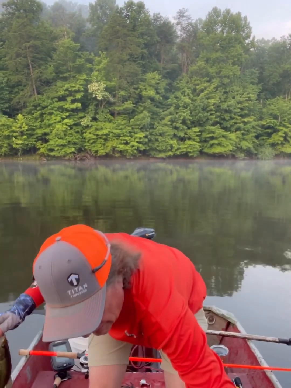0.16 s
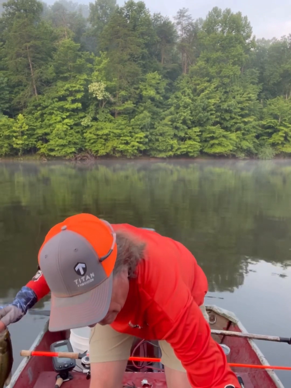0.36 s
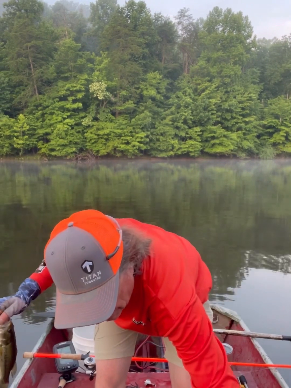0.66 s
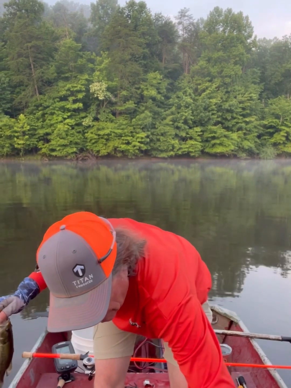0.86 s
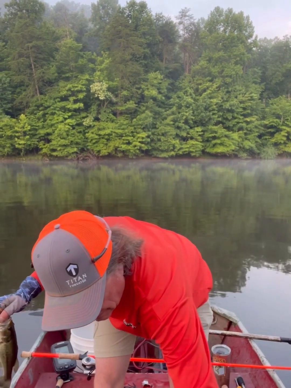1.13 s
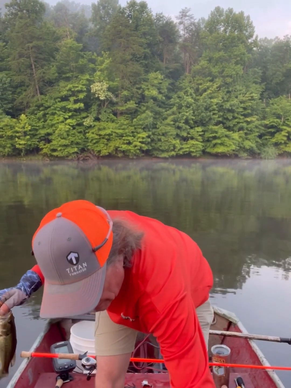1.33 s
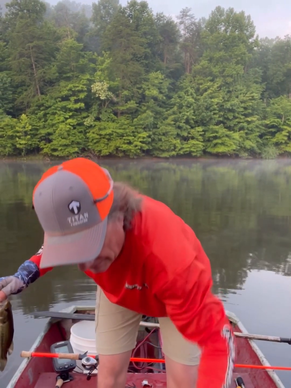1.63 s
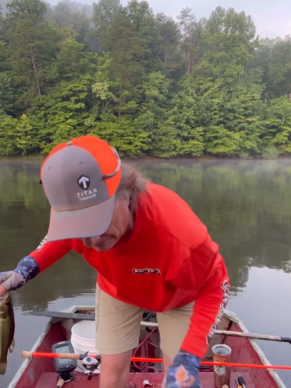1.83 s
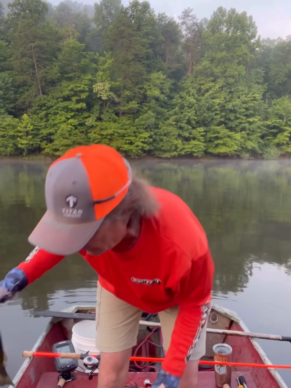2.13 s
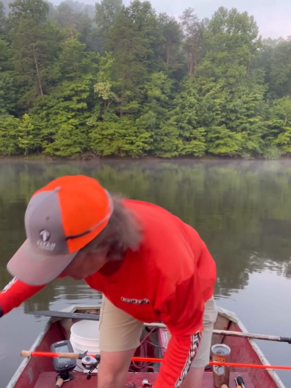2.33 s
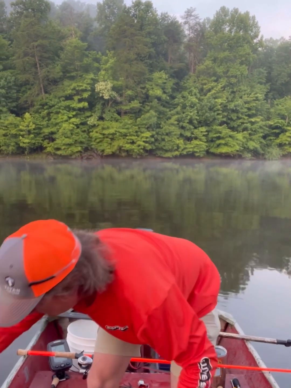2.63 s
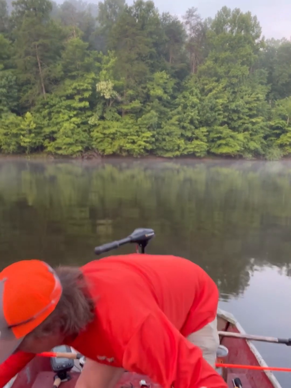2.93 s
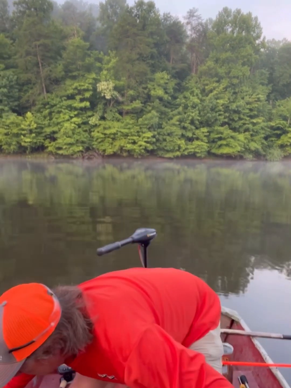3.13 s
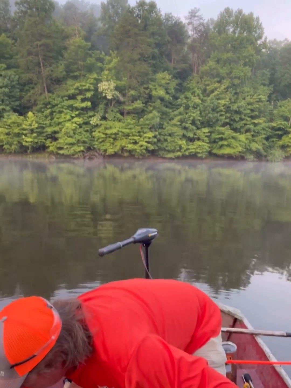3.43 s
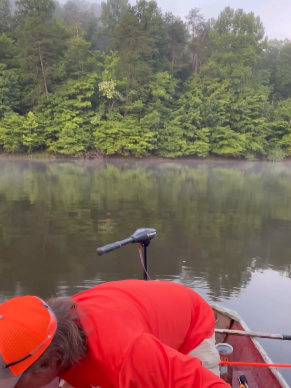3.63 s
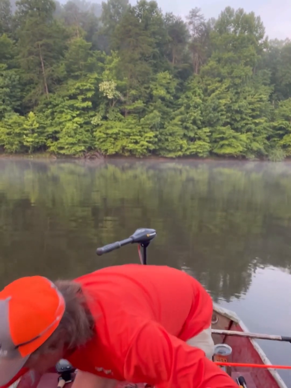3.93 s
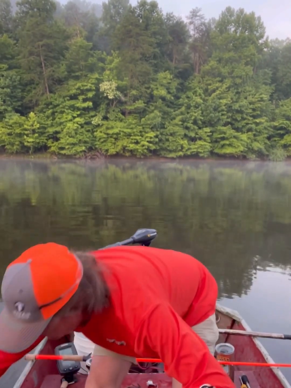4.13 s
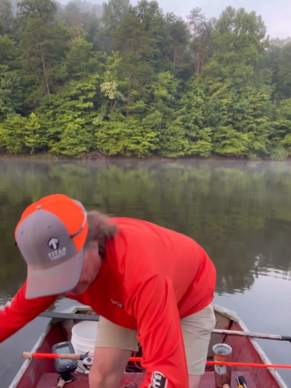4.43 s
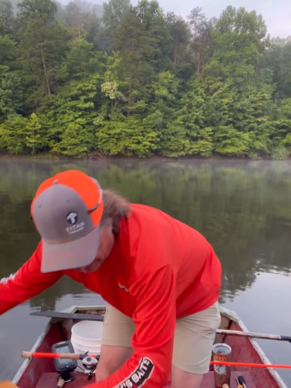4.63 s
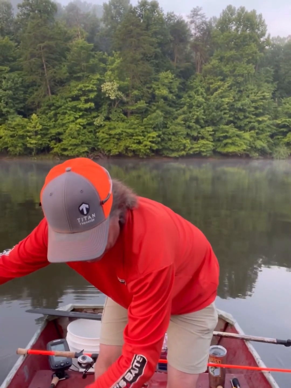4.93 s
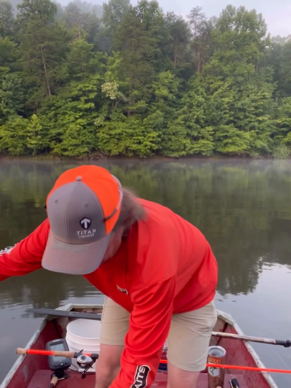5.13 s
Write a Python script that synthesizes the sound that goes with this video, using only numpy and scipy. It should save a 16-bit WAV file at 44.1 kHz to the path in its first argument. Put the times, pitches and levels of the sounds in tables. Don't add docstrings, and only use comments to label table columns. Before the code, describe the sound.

Outdoors on a still lake, close stereo phone microphones catch someone moving in a small metal boat. At once a lid grates, line rasps and gear scrapes; around 0.12-0.5 s a wet slap, a rubber chirp and a longer thin squeak sound while a tin box drags. A firm knock with a quick bounce lands at 0.56 s, then a soft, heavy boom at 0.74. Cloth rubs, and a lid creaks sharply at 1.3-1.5. The loudest blows crack and clang at 1.67 and 1.93, leaving a low hull hum. A tap at 2.3 and clink at 2.8 lead to quieter rustling, with soft thuds near 3.0 and a firm one at 3.6. Small taps cluster from 4.2, loudest at 4.55, and a bright dry tick snaps at 5.18. Throughout, insects chirr steadily and high; birds chip in quick rising pairs at 0.7-1.5, then trill, slur and whistle thinly, smeared by trees.

```python
import sys
import numpy as np
from scipy import signal
from scipy.fft import rfft, irfft
from scipy.io import wavfile
from scipy.ndimage import uniform_filter1d

SR = 44100
rng = np.random.default_rng(int(sys.argv[2]) if len(sys.argv) > 2 else 0)


def materialize(psi):
    bounded = np.clip(np.atleast_2d(psi).T, -1, 1)
    quanta = np.round(bounded * 32767).astype(np.int16)
    wavfile.write(sys.argv[1], SR, quanta)


def linear_from_db(decibels):
    return 10 ** (np.asarray(decibels, float) / 20)


N = 232218
TAP_PAN_DB = -2.5


def unit(x):
    return x / np.sqrt(np.mean(x ** 2))


def shape(x, points):
    hz, db = np.transpose(points)
    f = np.fft.rfftfreq(x.shape[-1], 1 / SR) + 1
    return irfft(rfft(x) * linear_from_db(np.interp(np.log(f), np.log(hz), db)), x.shape[-1])


def ring(x, hz, width_hz):
    return signal.lfilter(*signal.iirpeak(hz, hz / width_hz, SR), x)


def body(x, table):
    return unit(sum(linear_from_db(db) * ring(ring(x, hz, 3 * width), hz, width) for hz, width, db in table))


def walk(rate):
    k = int(SR / rate)
    held = np.repeat(rng.standard_normal(N // k + 1), k)
    return 0.52 * uniform_filter1d(uniform_filter1d(held, k), k)[:N]


def grains(per_s, spread_db, alike):
    size_db = spread_db * np.minimum(rng.exponential(size=N), 3)
    clicks = (rng.random(N) < per_s / SR) * linear_from_db(size_db)
    mid, side = clicks * rng.standard_normal((2, N))
    return np.array([mid, mid]) + np.sqrt(1 - np.clip(alike, 0, 1)) * np.array([side, -side])


def effort(rows, rise_db_s, fall_db_s):
    t = np.arange(N) / SR
    out = np.full((len(rows[0]) - 2, N), -120.)
    for s, length, *db in rows:
        off = rise_db_s * np.maximum(s - t, 0) + fall_db_s * np.maximum(t - s - length, 0)
        out = np.maximum(out, np.array(db)[:, None] - off)
    return out


def patchy(x, patchy_db):
    hz, _, z = signal.stft(x, SR, nperseg=512)
    field = uniform_filter1d(rng.standard_normal(z.shape[1:]), size=3, axis=0)
    field = uniform_filter1d(field, size=7, axis=1)
    field_db = patchy_db * unit(field) * np.clip(hz / 800 - 1.2, 0, 1)[:, None]
    return signal.istft(z * linear_from_db(field_db), SR, nperseg=512)[1][:, :N]


def add(out, x, s, pan_db):
    i = int(s * SR)
    x = x[..., :N - i] * linear_from_db(np.array([[pan_db], [-pan_db]]) / 2)
    out[:, i:i + x.shape[1]] += x


def decay(t, t60):
    return np.exp(-np.log(1000) * t / t60)


def fade(t):
    return np.clip((t[-1] - .04 - t) / .08, 0, 1)


def modes(table, t, scatter_db, turn):
    hz, db, t60 = np.transpose(table)[:, :, None]
    gain, start, step = rng.standard_normal((3, len(table), 1))
    tone_level = linear_from_db(db + scatter_db * gain) * decay(t, np.clip(t60, .01, .6))
    step = turn * step * np.clip(hz / 600, 0, 1)
    phase = 2 * np.pi * hz * t + 3 * start
    return np.array([np.sum(tone_level * np.sin(phase + side * step), axis=0) for side in (1, -1)])


def burst(t, rise_s, t60):
    noise = rng.standard_normal(len(t)) + 0.45 * rng.standard_normal((2, len(t)))
    return noise * (1 - np.exp(-t / rise_s)) * decay(t, t60)


# (frequency [Hz], level [dB per Hz])
SHORE = [(25, -7.5), (127, -4.5), (479, -12), (1670, -28), (2780, -11.5), (4600, -8), (5540, -19),
         (12000, -46)]


def shore():
    return linear_from_db(-67.5 + 0.89 * walk(12.0)) * unit(shape(grains(SR, 0, 0.23), SHORE))


# (frequency [Hz], width [Hz], level [dB])
INSECTS = [(4640, 390, -59), (2700, 370, -71.5)]


def insects():
    out = 0
    for hz, width, db in INSECTS:
        chorus = ring(ring(grains(3000, 1.2, 0.27), hz, width), hz, width)
        out = out + linear_from_db(db + 1.1 * walk(3.0) + 0.5 * walk(33)) * unit(chorus)
    return out


# (start [s], length [s], weight on the hull [dB], drag of gear [dB])
MOVES = [(0, 0.017, -56, -49), (.13, 0.047, -48.5, -44.5), (.17, 0.44, -56, -47.5), (.61, 0.22, -41, -48),
         (.78, 0.12, -43, -67), (.95, 0.078, -47.5, -51.5), (1.11, 0.15, -54.5, -53),
         (1.26, 0.23, -47.5, -45), (1.74, 0.4, -44.5, -78), (2.0, 0.16, -47, -60.5), (2.17, 0.55, -60, -62),
         (2.79, 0.11, -48, -55.5), (2.97, 0.13, -58, -56), (3.12, 0.096, -49.5, -57.5),
         (3.47, 0.055, -60, -87), (3.6, 0.12, -59, -86), (3.85, 0.1, -52, -58), (4.07, 0.21, -57.5, -62.5),
         (4.21, 0.034, -50, -59.5), (4.57, 0.06, -61.5, -73), (4.67, 0.04, -59, -63.5),
         (4.85, 0.095, -60.5, -64), (4.99, 0.036, -51, -87), (5.18, 0.027, -53.5, -61)]
# (start [s], length [s], rub [dB], cloth [dB])
SWEEPS = [(0, 0.028, -48, -47), (.15, 0.38, -50, -53.5), (.62, 0.13, -51.5, -55), (.78, 0.13, -55.5, -61),
          (.94, 0.098, -55, -59.5), (1.09, 0.013, -69, -58), (1.15, 0.28, -53, -59),
          (1.4, 0.059, -46.5, -55.5), (1.76, 0.36, -56.5, -71), (2.0, 0.011, -63, -52),
          (2.15, 0.53, -59, -63), (2.77, 0.12, -53, -51.5), (3.04, 0.13, -59.5, -68.5),
          (3.47, 0.2, -67, -93), (3.84, 0.13, -56, -63), (4.08, 0.17, -56.5, -57.5),
          (4.3, 0.086, -57, -60.5), (4.412, 0.03, -58.5, -57.5), (4.555, 0.0085, -64, -76),
          (4.8, 0.095, -70, -83.5), (5.18, 0.037, -58, -65)]
# (frequency [Hz], width [Hz], level [dB])
SCRAPE = [(246, 14, 5.5), (444, 240, 2.5), (624, 250, -4.5), (860, 50, -1), (950, 64, -13)]
# (frequency [Hz], width [Hz], level [dB])
RUB = [(1470, 270, -3.5), (2334, 1000, 4.5), (2888, 110, 4), (3460, 490, -5.5)]
# (frequency [Hz], level [dB per Hz])
CLOTH = [(2060, -45.5), (3500, -14), (4650, -4), (8620, -10), (11600, -15.5), (12600, -14), (13300, -58)]


def handling():
    rumble_db, scrape_db = effort(MOVES, rise_db_s=598, fall_db_s=243)
    rub_db, cloth_db = effort(SWEEPS, rise_db_s=496, fall_db_s=300.5)
    hull = [(62, 27, -11.0), (86.5, 81, 2.5), (117.0, 41, -1.5), (156.9, 10.0, 5.0), (221, 47, -7.0)]
    rumble = body(grains(810, 5.7, 1.0), hull)
    scrape = body(grains(2100, 0.94, 0.72), SCRAPE) * linear_from_db(np.array([[-1.5], [1.5]]))
    rub = body(grains(4000, 0.73, 0.57), RUB)
    cloth = unit(shape(grains(7300, 1.1, 0.55), CLOTH))
    drag_db = 3 * np.clip(walk(35), -2, 1.2)
    out = rumble * linear_from_db(rumble_db - 3.0 + 0.83 * walk(2.6))
    out = out + scrape * linear_from_db(scrape_db - 3.5 + drag_db)
    out = out + rub * linear_from_db(rub_db - 5.0 + drag_db)
    return out + cloth * linear_from_db(cloth_db - 4.0 + 1.4 * walk(33))


# (time [s], level [dB])
PULL = [
    (0, -60),
    (.13, -97),
    (.155, -47),
    (.3, -47.5),
    (.45, -57.5),
    (.55, -52.5),
    (.6, -90.5),
]
# (frequency [Hz], width [Hz], level [dB])
TIN = [(243.2, 30, -3), (1600, 110, 5.5), (2300, 180, 2.5), (3797, 100, -17), (4840, 320, -6.5),
       (5900, 120, -5), (6800, 350, -9), (7710, 230, -8.5), (8980, 92, -4.5)]


def tin_box():
    pull_db = np.interp(np.arange(N) / SR, *np.transpose(PULL))
    return body(grains(4500, 1.2, 1.0), TIN) * linear_from_db(pull_db + 1.0 * walk(41))


# (start [s], length [s], level [dB])
RASPS = [
    (0, 0.11, -54),
]
# (frequency [Hz], width [Hz], level [dB])
RINGS = [(6900, 560, 2.6), (7960, 400, -5)]


def line_rasp():
    return body(grains(1200, 2, 0.97), RINGS) * linear_from_db(effort(RASPS, 500, 500))


# (start [s], length [s], level [dB])
GROANS = [
    (.01, 0.027, -43.5),
    (.42, 0.055, -44),
]
# (frequency [Hz], width [Hz], level [dB])
SEAT = [(238.7, 21, 0)]


def seat_groans():
    return body(grains(900, 1.5, 0.4), SEAT) * linear_from_db(effort(GROANS, 330, 200))


# (start [s], length [s], level [dB])
CREAKS = [
    (1.29, 0.009, -39.5),
    (1.33, 0.035, -41.5),
    (1.418, 0.012, -37),
    (1.44, 0.019, -38.5),
    (1.466, 0.0056, -42.5),
    (4.25, 0.11, -64.5),
]
# (frequency [Hz], width [Hz], level [dB])
LID = [(816, 14, 6), (580, 42, -4.5)]


def lid_creaks():
    creak_db = effort(CREAKS, 1400, 910) + np.array([[-2.5], [2.5]])
    return body(grains(1500, 1.2, 0.35), LID) * linear_from_db(creak_db)


# (start [s], length [s], level [dB])
SLIDES = [
    (0, 0.037, -39),
    (.058, 0.0073, -51),
    (.09, 0.023, -49),
]
# (frequency [Hz], width [Hz], level [dB])
HATCH = [(442, 65, -0.5), (560, 67, 1.5), (844, 110, -1.5), (2150, 69, -5.5)]


def sliding_lid():
    return body(grains(6000, 0.87, .5), HATCH) * linear_from_db(effort(SLIDES, 900, 450))


# (time [s], peak level [dB], pitch of the struck part [Hz], ring [s])
CLINKS = [
    (0.059, -42, 249, 0.086),
    (0.089, -36, 783, 0.051),
    (1.015, -40, 193, 0.37),
    (2.783, -33, 998, 0.02),
    (4.449, -47.5, 2300, 0.028),
    (4.549, -32, 533, 0.043),
    (4.839, -48, 1930, 0.049),
    (5.166, -43.5, 734, 0.089),
]
# (time [s], peak level [dB], pitch [Hz], ring [s])
TAPS = [(1.243, -42, 950, 0.082), (1.292, -34.5, 870, 0.022), (1.419, -44, 756, 0.043),
        (1.464, -59, 750, 0.049), (2.282, -33.5, 910, 0.0088), (3.187, -43.5, 533, 0.045),
        (3.448, -51.5, 342, 0.086), (4.206, -43.5, 713, 0.045), (4.424, -56, 2150, 0.055),
        (4.44, -52.5, 820, 0.067), (4.66, -41.5, 696, 0.039), (4.808, -43, 520, 0.095),
        (4.557, -26.5, 510, 0.046), (4.919, -51.5, 650, 0.024), (4.975, -54, 744, 0.058)]
# (time [s], peak level [dB], pitch [Hz], ring [s])
THUDS = [
    (0.15, -36, 834, 0.31),
    (0.364, -38.5, 492, 0.27),
    (2.996, -37.5, 413, 0.098),
    (3.143, -48.5, 793, 0.19),
    (3.588, -32.5, 489.4, 0.17),
    (3.607, -33.5, 421.5, 0.22),
    (3.84, -49, 739, 0.22),
]


def taps():
    out, t = np.zeros((2, N)), np.arange(SR // 3) / SR
    kinds = ((CLINKS, -6), (TAPS, -28), (THUDS, -60))
    for s, db, hz, t60, crack_db in [(*row, crack_db) for rows, crack_db in kinds for row in rows]:
        wet_db = 45 * t60
        part = [(hz, 0, t60), (hz * 1.17, -7, t60 * .8), (hz * .82, -11, t60),
                (hz * .55, wet_db - 22, t60), (hz * 1.6, -11, t60 * 0.7), (2250, crack_db, .04)]
        ringing = modes(part, t, scatter_db=2, turn=.3) * (1 - np.exp(-t / .001))
        bright = shape(burst(t, .0007, t60 * .5),
                       [(hz / 2, -20), (hz * 1.4, 0), (hz * 2.4, -10), (hz * 7, -56)])
        dark = shape(burst(t, .003, t60 * 1.3),
                     [(hz / 4, -24), (hz * .7, -3), (hz * 1.2, 0), (hz * 2.2, -24), (hz * 6, -70)])
        crack = shape(burst(t, 0.0076, 0.073), [(3000, 7.0), (6000, 7.0), (11000, -3.0), (15000, -6.0)])
        hit = linear_from_db(-1.5 - wet_db / 2) * ringing + linear_from_db(6 - wet_db / 2) * bright
        hit = hit + linear_from_db(wet_db - 2) * dark + linear_from_db(crack_db - 2.5) * crack
        add(out, linear_from_db(db) * fade(t) * hit, s, TAP_PAN_DB)
    return out


# (time [s], peak level [dB], pitch [Hz], ring [s])
KNOCKS = [(.124, -52, 1400, .012), (0.15, -27, 1250, .015), (.7382, -27.5, 2230, 0.026),
          (0.77, -39, 2440, .03), (0.76, -35.5, 5540, 0.027), (1.293, -34, 900, .02),
          (1.595, -55, 960, .01), (2.282, -43, 1000, .012), (.832, -38, 330, .06), (.76, -38, 630, .04),
          (4.661, -43.5, 720, 0.023), (4.81, -41.5, 580, 0.024), (4.977, -52, 640, 0.022),
          (.09, -42, 770, 0.024), (4.99, -60, 8600, .01), (5.056, -58, 6200, .01), (5.18, -45, 7000, .03),
          (4, -57, 8600, .015), (2.753, -49, 7200, 0.018)]


def knocks():
    out, t = np.zeros((2, N)), np.arange(SR // 8) / SR
    for s, db, hz, t60 in KNOCKS:
        partials = ((.62, 5.5), (1, 4), (1.35, -13), (1.9, -26))  # (ratio, dB)
        part = [(hz * ratio, part_db, t60) for ratio, part_db in partials]
        knock = modes(part, t, scatter_db=-0.5, turn=0.58) * np.clip(t / 0.00049, 0, 1)
        add(out, linear_from_db(db - 6.5) * knock, s - .001, TAP_PAN_DB)
    return out


# (time [s], frequency [Hz], level [dB])
SQUEAKS = [
    [(0.12, 2870, -76), (0.132, 2990, -44), (0.15, 2760, -31.5), (0.175, 2700, -68)],
    [(0.245, 3320, -59), (0.265, 3300, -43), (0.284, 3310, -38), (0.31, 3286, -38), (0.326, 3310, -53),
     (0.37, 3316, -38), (0.44, 3296, -49.5), (0.53, 3250, -62), (0.55, 3310, -68)],
]


def squeaks():
    out = np.zeros((2, N))
    for table in SQUEAKS:
        s, hz, db = np.transpose(table)
        t = np.arange(s[0], s[-1], 1 / SR)
        turns = np.cumsum(np.interp(t, s, hz) * (1 + 0.0066 * walk(122)[:len(t)])) / SR
        level = linear_from_db(np.interp(t, s, db) + 3.5 + 2.5 * walk(61)[:len(t)])
        level = level * signal.windows.tukey(len(t), .2)
        add(out, level * np.sin(2 * np.pi * turns + np.array([[.6], [-.6]])), s[0], -.8)
    return out


def far_chorus():
    notes = []
    for when, pitch, slur, size in rng.random((170, 4)):
        hz = 2200 + 1500 * pitch
        notes.append((4.75 * when, .015 + .035 * size, hz, hz * (.75 + .5 * slur), -70 + 3 * size, .5))
    return notes


# (start [s], length [s], first pitch [Hz], last pitch [Hz], level [dB])
DIVES = [(1.597, 0.089, 7300, 4100, -53.5), (1.733, 0.049, 10000, 4140, -50.5),
         (1.857, 0.051, 7260, 5300, -52), (.858, 0.029, 5950, 5400, -55), (1.05, .03, 6000, 5500, -53),
         (1.242, 0.03, 5540, 5600, -60), (1.258, 0.026, 7400, 4800, -51.5),
         (4.689, 0.07, 7270, 5930, -75.5), (2.229, 0.041, 3000, 2500, -54.5),
         (4.463, 0.024, 3380, 2995, -57.5), (4.502, 0.03, 3300, 3000, -56.5),
         (4.423, 0.034, 2030, 2260, -55), (4, 0.022, 3150, 3450, -55), (4.585, 0.028, 3100, 2900, -59),
         (4.69, 0.034, 2850, 2400, -63.5), (4.3, .035, 2100, 2900, -56), (4.39, .025, 3000, 2800, -56),
         (.845, 0.021, 3350, 3150, -54), (5.07, 0.053, 2500, 1870, -71)]
# (start [s], length [s], first pitch
# [Hz], last pitch [Hz], level [dB])
HOOKS = [(2.095, 0.12, 7600, 6830, -56), (2.62, 0.16, 6000, 6500, -66), (2.95, 0.21, 5540, 6300, -61),
         (3.272, 0.2, 5390, 6200, -62.5), (3.431, 0.12, 5500, 5000, -56.5),
         (3.603, 0.17, 5190, 5680, -59.5), (3.955, 0.13, 4840, 5040, -58.5),
         (4.905, 0.16, 3800, 4450, -65.5), (5.126, 0.14, 3900, 4130, -65.5), (5.04, 0.096, 2400, 1880, -90),
         (3.25, .3, 6550, 6100, -69.5), (.165, .085, 3560, 3460, -50.5), (.205, 0.041, 3800, 4800, -44.5)]
# (start [s], length [s], pitch [Hz], level [dB])
PIPS = [
    (0.878, 0.023, 4494, -48),
    (1.205, 0.053, 4480, -50),
    (1.438, 0.014, 7440, -53.5),
    (1.454, 0.032, 6250, -59.5),
    (1.524, 0.034, 3904, -54),
    (1.074, 0.018, 4480, -46.5),
    (1.99, 0.125, 5530, -61),
    (3.175, 0.043, 5260, -62),
    (3.285, 0.0075, 1334, -54.5),
    (3.407, 0.0077, 1305, -59),
]


def song():
    dives = [(*note, 0.62) for note in DIVES]
    hooks = [(*note, 12) for note in HOOKS]
    pips = [(s, length, hz, hz * 0.97, db, 1.) for s, length, hz, db in PIPS]
    return dives + hooks + pips


# (first note [s], last note [s], level [dB])
TRILLS = [
    (1.598, 1.66, -53),
    (1.765, 1.9, -54),
]


def trill():
    return [(s, .014, 2100, 2750, db, .8)
            for first_s, last_s, db in TRILLS for s in np.arange(first_s, last_s, .0165)]


def birds():
    voice = np.zeros((2, N))
    throat, gusts = np.tile(walk(300), 2), np.tile(walk(70), 2)
    for s, length, first_hz, last_hz, db, bend in song() + trill() + far_chorus():
        u = np.arange(0, 1, 1 / (length * SR))
        i = int(s * SR)
        hz = first_hz + (last_hz - first_hz) * (1 - np.exp(-bend * u)) / (1 - np.exp(-bend))
        hz = hz * (1 + .018 * np.sin(2 * np.pi * 95 * u * length + 40 * s))
        hz = hz * (1 + .018 * throat[i:][:len(u)])
        level = linear_from_db(db + 3.5 * gusts[i:][:len(u)]) * np.sin(np.pi * u ** 0.51)
        add(voice, level * np.sin(2 * np.pi * np.cumsum(hz) / SR), s, 0)
    t = np.arange(SR // 2) / SR
    leaves, trees = burst(t, .001, .06), burst(t, .02, .6)
    smear = linear_from_db(-20) * leaves + linear_from_db(-36) * shape(trees, [(1600, -30), (2200, 0)])
    return linear_from_db(-10) * voice + signal.fftconvolve(voice, smear, axes=1)[:, :N]


def skid(db, length_s):
    t = np.arange(-length_s, 0, 1 / SR)
    level = linear_from_db(db + 1500 * t + 2.5 * np.sin(2 * np.pi * 170 * t))
    whine = level * np.sin(2 * np.pi * 2620 * t + np.array([[.3], [-.3]]))
    return whine * np.hanning(int(2 * length_s * SR) + 2)[:len(t)]


# (time [s], peak level [dB], crack [dB], boom [dB], contact [ms])
BLOWS = [
    (0.557, -13, -2, -3, 6.5),
    (0.576, -23, -6.5, -31, 1.9),
    (0.736, -7, -55, -8.5, 62),
    (1.673, -4.5, -7.5, -6.5, 3.7),
    (1.926, -1.5, -8, -17, 4.2),
]
# (short ribs [dB], plates [dB], contact snap [dB], loose buzz [dB], rib ring left [share])
SPOTS = [
    (-10, 0.5, -26, 2, 0.87),
    (1, 1.5, -19, -4.5, 0.92),
    (-22, 8.5, -40, -5, 1.),
    (5, 1, 1, -3, 0.88),
    (9, 0, -6, -0.5, 0.82),
]
# (frequency [Hz], level [dB], t60 [s])
HULL = [(84.7, -5, 0.4), (142.5, 2, 0.26), (172.1, 2.5, 0.26), (325, -1, 0.17), (278.7, -5, 0.15),
        (372, -5, 0.085), (510, -19.5, 0.37), (262.6, -13, 0.34), (756, -17.5, 0.13), (1040, -21.5, 0.16)]
# (frequency [Hz], level [dB], t60 [s])
PLATES = [(607.7, -5, .1), (679, -5, .1), (826, -3.5, 0.093), (882.5, -3, .06), (1191, -15, 0.1),
          (1930, -6, .04), (2180, -2.5, 0.069), (2290, -7, .05), (2530, -4, 0.03), (2830, -0.5, .045),
          (3030, -3.5, .045), (3310, -12, 0.034), (5900, -14, .04), (6570, -15, .12)]
# (frequency [Hz], left minus right [dB])
SHADE = [(130, -0.5), (500, -5), (1000, -1), (2000, 3), (4000, 0.5)]


def blows():
    out, t = np.zeros((2, N)), np.arange(SR // 2) / SR
    for (s, db, crack_db, boom_db, contact_ms), spot in zip(BLOWS, SPOTS):
        rib_db, plate_db, snap_db, buzz_db, damped = spot
        swell = 1 - np.exp(-(t * 1000 / contact_ms) ** 2)
        flexed = [(hz, mode_db + rib_db * (hz > 250), t60 * (damped if hz > 130 else 1))
                  for hz, mode_db, t60 in HULL]
        hull = modes(flexed, t, scatter_db=1.0, turn=0.1) * swell * (1 - np.exp(-t / 0.0024))
        top_db = crack_db / 2 + db + 9.5
        struck = [(hz, mode_db + top_db * (hz > 5000), t60) for hz, mode_db, t60 in PLATES]
        plates = modes(struck, t, scatter_db=2.5, turn=0.96) * (1 - np.exp(-t * 1500 / contact_ms))
        late = t - .001
        snap = np.sin(2 * np.pi * 2843 * t) * decay(late, 0.0098) * np.clip(late / 0.00038 + .15, 0, 1)
        crack = shape(burst(t, contact_ms / 8000, 0.035),
                      [(1500, -25.0), (2600, -3.5), (7000, -5.0), (12000, -10.0), (15000, -27.0)])
        clang = shape(burst(t, contact_ms / 2500, 0.042),
                      [(300, -36.0), (700, -6.5), (1400, -14.0), (2000, 0.0), (2900, -10.5),
                       (4200, -11.0), (9000, -33.0)])
        buzz = shape(burst(t, 0.0059, 0.23),
                     [(100, -10.5), (300, 9.5), (800, -2.0), (1400, -11.5), (2600, -17.0),
                      (6000, -34.5), (13000, -57)])
        hit = linear_from_db(boom_db - 6.5) * hull + linear_from_db(plate_db - 11.0) * plates + linear_from_db(snap_db) * snap
        hit = hit + linear_from_db(crack_db + 6.0) * crack + linear_from_db(5.5) * clang + linear_from_db(buzz_db - 2.0) * buzz
        hit = np.array([shape(port, [(hz, side * pan_db / 2) for hz, pan_db in SHADE])
                        for port, side in zip(hit, (1, -1))])
        add(out, linear_from_db(db) * hit * fade(t), s, -0.64)
        if snap_db > -12:
            add(out, skid(db - 17, .013), s - .013, 1.5)
    return out


# (start [s], length [s], frequency [Hz], level [dB])
HUMS = [
    (0.598, 0.39, 83, -53),
    (1.695, 0.14, 81.5, -32.5),
    (1.832, 0.24, 90.3, -37),
    (2.101, 0.097, 92.4, -47),
    (4.206, 0.088, 76, -49),
]


def keel_hums():
    out = np.zeros((2, N))
    for s, length, hz, db in HUMS:
        u = np.arange(0, length + 0.038, 1 / SR)
        hum = signal.windows.tukey(len(u), .6) * np.sin(2 * np.pi * hz * u)
        add(out, linear_from_db(db + 1.5) * hum, s - .03, -1)
    return out


def chips():
    out, u = np.zeros((2, N)), np.linspace(0, 1, 1000, endpoint=False)
    bow = np.abs(2 * u - 1)
    stroke = (0, .019, 7500 - (7500 - 5900) * np.exp(-3.5 * u), -9 * (1 - u) ** 2)  # (lag s, length s, Hz, dB)
    arch = (.027, .017, 5000 - 1500 * bow ** 1.2, 2 - 8 * bow)
    for s in .6785 + .1405 * np.arange(7):
        for lag, length, hz, db in (stroke, arch):
            v = np.arange(0, 1, 1 / (length * SR))
            level = linear_from_db(np.interp(v, u, db) - 42 - 5.5 + 1.5 * rng.standard_normal())
            note = level * np.sin(np.pi * v) ** .6
            turns = np.cumsum(np.interp(v, u, hz)) / SR
            add(out, note * np.sin(2 * np.pi * turns), s - .012 + lag, 0)
    trees = burst(np.arange(SR // 3) / SR, 0.0046, .3)
    return out + linear_from_db(-33.5) * signal.fftconvolve(out, trees, axes=1)[:, :N]


# (time [s], peak level [dB], ring [ms])
TICKS = [(3.048, -46, 9), (3.909, -42.5, 12), (4.3897, -53, 12), (4.4172, -43.5, 25), (4.981, -48.5, 8.9),
         (5.0464, -42.5, 8), (5.1797, -26.5, 43), (2.997, -53, 12), (3.1, -50, 12), (3.2, -53.5, 12),
         (3.634, -58.5, 11), (4.735, -54.5, 6.9), (4.905, -58, 13), (5.118, -54, 8)]


def ticks():
    out, t = np.zeros((2, N)), np.arange(SR // 3) / SR
    for s, db, ring_ms in TICKS:
        tick = shape(burst(t, 0.0003, ring_ms / 1000),
                     [(4500, -19.0), (7000, 6.0), (11000, 0.5), (13500, 2), (16000, -3.5)])
        add(out, linear_from_db(db - 3.5) * tick * fade(t), s, 0)
    return out


def scene():
    friction = handling() + tin_box() + line_rasp() + seat_groans() + lid_creaks()
    contacts = sliding_lid() + taps() + knocks() + blows() + keel_hums() + ticks()
    return patchy(shore() + friction, patchy_db=3.5) + insects() + contacts + squeaks() + birds() + chips()


def roll_off(x):
    return signal.sosfilt(signal.butter(12, 15800, fs=SR, output="sos"), x)


def record(dry):
    hz = np.fft.rfftfreq(N, 1 / SR)
    drift = np.clip(hz / 12700, 0, .95) ** 4
    turn = np.exp(-.5j * np.pi * drift * np.array([[1], [-1]]))
    top = 1 / (1 + (hz / 14200) ** 30)
    bass_cut = signal.butter(3, 62, "high", fs=SR, output="sos")
    x = signal.sosfilt(bass_cut, irfft(rfft(dry) * turn * top, N))
    mix = np.tanh(x / 1.5) * 1.5
    return roll_off(mix)


dry = scene()
out = record(dry)
materialize(out)
```